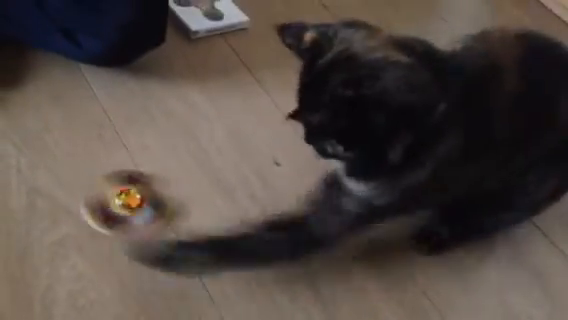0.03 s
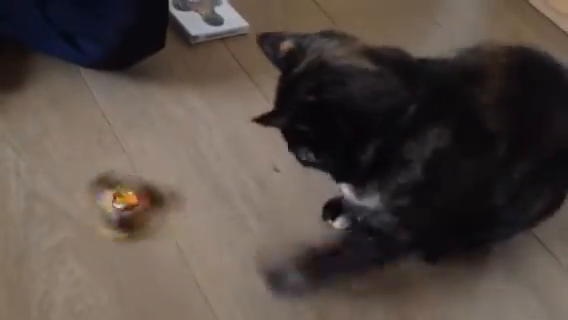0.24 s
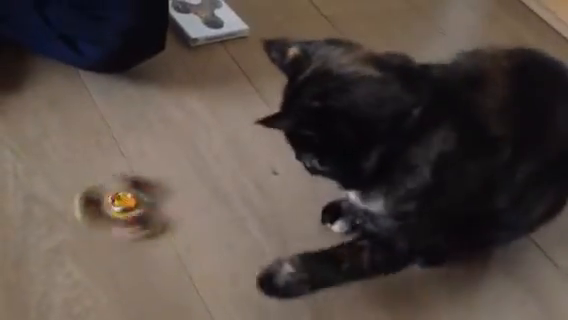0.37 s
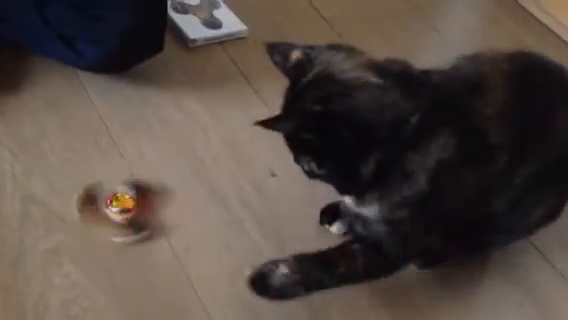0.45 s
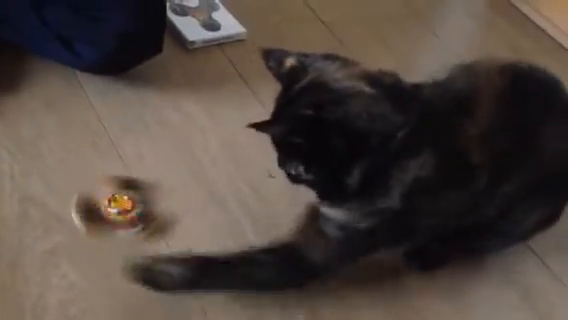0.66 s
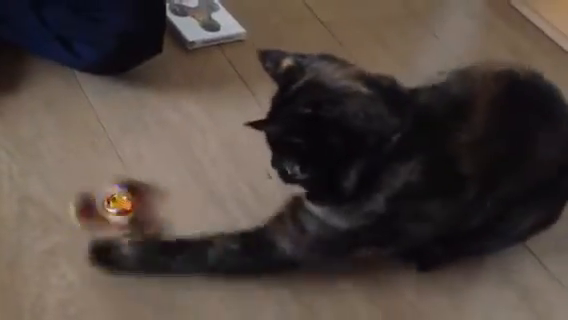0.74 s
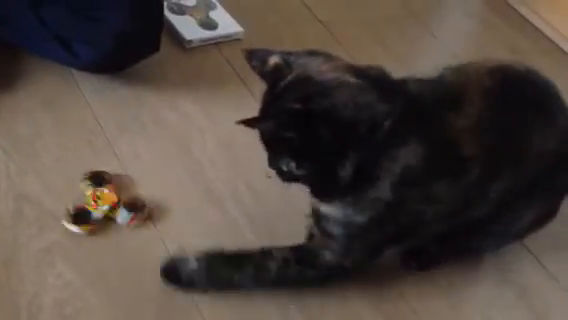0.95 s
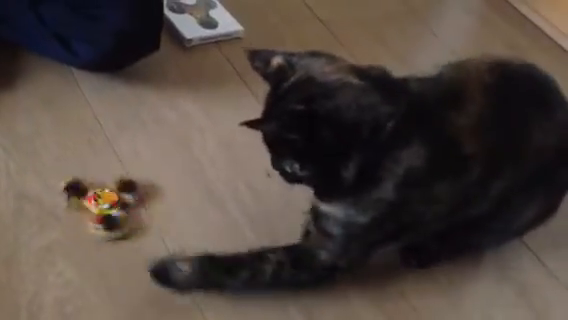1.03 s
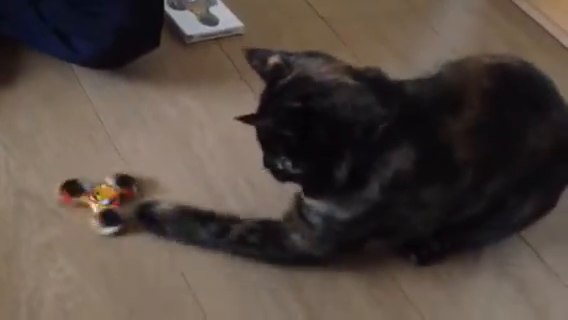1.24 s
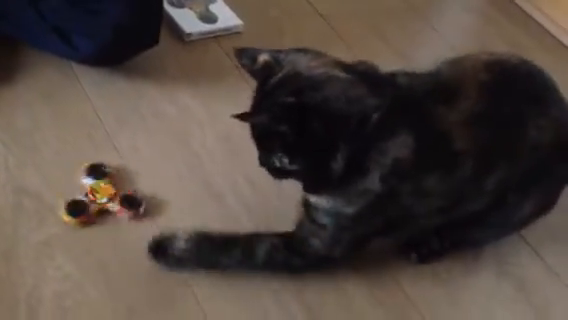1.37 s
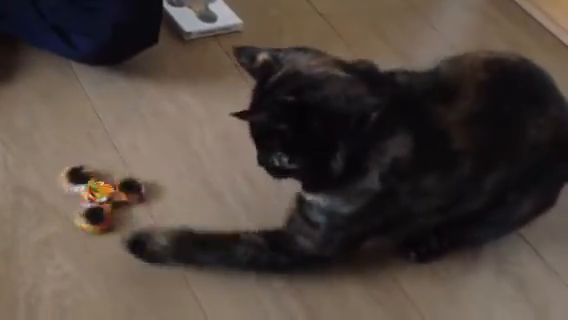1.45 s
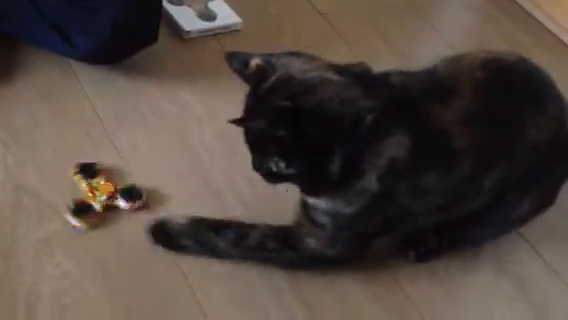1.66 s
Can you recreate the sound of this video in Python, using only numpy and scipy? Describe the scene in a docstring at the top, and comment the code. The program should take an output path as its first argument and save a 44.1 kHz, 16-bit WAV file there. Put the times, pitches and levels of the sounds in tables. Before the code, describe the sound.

A fidget spinner clatters on floorboards in a small, quiet room. Faint metal pings lead to a hard knock, followed by three bursts of rapid clicks and rattles as it rocks, with a soft whirr underneath.

```python
"""A soft whirr and faint metal pings come from a three-armed spinner that a cat bats on a wooden floor.
The toy is knocked down hard and clatters, then rocks from arm to arm in three runs of quickening taps,
with one brush of the paw. Every tap thumps the floorboard and rattles the ball bearing, and the rim
rumbles as the toy settles. A small room echoes it all over a faint steady hush."""
import sys
import numpy as np
from scipy import signal
from scipy.fft import rfft, irfft, next_fast_len
from scipy.io import wavfile
from scipy.ndimage import map_coordinates

SR = 44100
rng = np.random.default_rng(int(sys.argv[2]) if len(sys.argv) > 2 else 0)


def master(y):
    """Save y as 16-bit WAV."""
    cut = np.clip(np.atleast_2d(y).T, -1, 1)
    pcm = np.round(cut * 32767)  # scale
    wavfile.write(sys.argv[1], SR, pcm.astype(np.int16))


N = 74970

# Levels in the tables are relative. A fade time is how long a sound takes to drop by 60 dB.
# The tone colour of each noisy sound. Each row: frequency in Hz, level in dB.
HUSH_COLOUR = [(20, -34.5), (60, -1), (120, 2.5), (220, -6.5), (400, 3), (700, -13.5), (1700, -19.5),
               (2200, -16.5), (5000, -22), (9000, -26), (12000, -24), (15500, -35)]
BEARING_COLOUR = [(1000, -28), (4500, -18), (5500, -10), (6080, 4), (6600, -10.5), (7300, -9.5),
                  (10000, -22), (15000, -21)]
BOARD_HUM_COLOUR = [(100, -45), (250, -21), (350, -6.5), (430, -7.5), (600, -18.5), (1500, -29),
                    (4000, -63)]
RIM_COLOUR = [(40, -24), (100, -10.5), (140, -16.5), (175, -0.5), (220, 7.5), (300, -3.5), (450, -24.5),
              (700, -21), (1300, -36), (3000, -39)]
FUR_COLOUR = [(1000, -30), (5000, -14), (7000, -10), (8500, 0), (11000, -16), (14500, -6), (16000, -15)]
CRACK_COLOUR = [(40, -14), (140, -13), (300, -2), (600, 7.5), (780, -1), (1150, -1.5), (1600, -3.5),
                (2200, 0), (3200, -2.5), (4500, -2), (6400, -3.5), (8500, -5), (11000, -11.5), (14000, -18),
                (16000, -9)]
RATTLE_COLOUR = [(200, -9.5), (800, -18), (1300, -18.5), (2200, -25), (4400, -15.5), (5500, -2.5),
                 (6300, 7), (7100, -2), (9000, -6.5), (11000, -14.5), (14000, -9), (16000, -8.5)]
TICK_COLOUR = [(200, -24), (700, -2.5), (950, 2), (1300, 1.5), (1700, -8), (3000, -14.5), (5000, -11.5),
               (15000, -25.5)]
# The notes each part rings with. Each row: frequency in Hz, level in dB, fade time in seconds.
PING_NOTES = [(5080, -3, 0.038), (5850, -25.5, 0.025), (12040, -21, 0.034)]
FRAME_NOTES = [(565, -10.5, 0.16), (642.5, -11.5, 0.18), (855, -10.5, 0.056), (907, -11.5, 0.15),
               (947, -4.5, .04), (1177, -6, 0.026), (1290, -21, 0.036), (2150, -21, 0.11),
               (2570, -18, 0.094), (3107, -21, 0.069), (3914, -15.5, 0.085), (4420, -18.5, 0.15),
               (6270, -11, 0.099), (6364, -9, 0.045)]
STEEL_RING_NOTES = [(6080, -1, .04), (6300, 0, .025), (6530, -4, .025)]
HARD_BOARD_NOTES = [(246, -15.5, 0.028), (373.7, -3.5, 0.044), (437, -1.5, 0.032)]  # the floorboard under a hard blow
LIGHT_BOARD_NOTES = [(249.4, -13, 0.037), (341.3, -4, 0.028), (389.1, -4.5, 0.037), (577, -12, 0.013)]  # the floorboard under a light tap
# How long the room rings. Each row: frequency in Hz, fade time in seconds.
ROOM_FADES = [(150, .5), (400, 0.25), (1000, 0.56), (3000, 0.57), (7000, 0.55), (15000, 0.44)]
# Early echoes from the walls. Each row: delay in seconds, level in dB.
WALL_ECHOES = [(0.017, -25.5), (0.0282, -12.5)]
# How the bearing's whirr and the rim's rumble rise and fall. Each row: time in seconds, level in dB.
BEARING_LEVELS = [(0, -70), (.13, -71), (.18, -74), (.4, -66.5), (.62, -71.5), (0.751, -77), (.89, -78),
                  (.98, -69.5), (1.15, -71), (1.3, -81), (1.4, -72.5), (1.55, -70.5), (1.66, -85)]
RIM_LEVELS = [(0, -80), (.42, -69), (.55, -60), (.68, -61), (.78, -82.5), (.92, -66.5), (1.05, -59),
              (1.2, -57.5), (1.29, -81), (1.42, -59), (1.56, -59), (1.68, -71.5)]
# Scrapes inside the bearing. Each row: start in seconds, level in dB, length in seconds.
SCRAPES = [(0.000, -57, 0.0043), (0.029, -63, 0.012), (0.043, -50, .003), (0.107, -55, 0.0023),
           (0.12, -60, 0.0091), (0.195, -51.5, 0.002)]
# Hard blows on the floor. Each row: start in seconds, thud level in dB, crack level in dB,
# crack fade time in seconds.
HARD_BLOWS = [(0.2232, -21, -21, 0.038), (0.2380, -28.5, -32.5, 0.061), (0.2426, -35, -31, 0.055),
              (0.246, -26.5, -41.5, 0.09), (0.2610, -33, -32, 0.061), (0.268, -36, -39, 0.18)]
# An arm meets the floor. Each row: start in seconds, thump, tick and rattle levels in dB,
# rattle length in seconds, rattle treble tilt in dB per octave.
ARM_TAPS = [(0.2146, -31.5, -43, -33, .003, -7), (0.2523, -42, -59, -33, 0.0042, -1),
            (0.338, -63, -66, -52, 0.0037, -9), (0.381, -75, -58, -47.5, 0.0086, -7),
            (0.4217, -46.5, -56, -47.5, 0.01, -6.5), (0.4265, -93, -77, -49.5, 0.0011, 7),
            (0.4642, -45.5, -55, -50.5, 0.0035, -5.5), (0.4999, -55, -54.5, -48.5, .002, -8),
            (0.504, -55, -63, -46.5, 0.0018, -5), (0.5362, -35, -48.5, -46, 0.0039, -3.5),
            (0.5647, -38, -50, -48, 0.0037, -3.5), (0.5910, -42.5, -59.5, -60, 0.0025, -3),
            (0.6176, -79, -74, -58.5, .003, -5), (0.6342, -43.5, -57, -50, 0.0019, -6.5),
            (0.65, -53, -61.5, -57, .002, -4), (0.669, -51, -66, -58.5, 0.0013, -6),
            (0.9120, -37, -59.5, -49.5, 0.0049, -12), (0.966, -25.5, -47.5, -45.5, 0.0059, -1),
            (0.9755, -47, -72, -46.5, 0.0014, -4), (1.013, -30.5, -61, -44, 0.0029, -8),
            (1.021, -48, -64, -45.5, 0.0017, -11), (1.0519, -34, -47.5, -45, 0.0037, -7),
            (1.0853, -31, -60.5, -51, 0.0034, -5.5), (1.1150, -55, -55, -49, 0.0063, -3),
            (1.14, -72, -70, -57, 0.0056, -5), (1.1656, -48.5, -65, -54, 0.0014, -8),
            (1.1878, -46.5, -78, -57.5, .002, -3), (1.204, -42.5, -63, -61, 0.0016, 3),
            (1.219, -49, -70, -69, 0.0019, -4), (1.3237, -35.5, -55, -58.5, 0.0094, 0.5),
            (1.3682, -26, -58, -47, 0.0026, -4), (1.4080, -29, -56, -47.5, 0.004, -4),
            (1.415, -64, -77, -47, 0.0017, -0.5), (1.4455, -33, -67, -52.5, 0.0044, -4),
            (1.4743, -58, -77, -42, 0.0014, 6), (1.5036, -41.5, -58.5, -57, 0.0038, -11),
            (1.5288, -40, -64, -55, 0.0039, -8.5), (1.5526, -41, -57, -50.5, 0.0014, -8),
            (1.5700, -47.5, -59.5, -58, 0.0038, -10), (1.6900, -69, -77, -67, .009, -2.5)]

SCRAPE_GRAINS_PER_S, BALL_HITS_PER_S = 740, 4000
RATTLE_FADE_S, TICK_FADE_S = .012, .019


def amp(db):
    """Turn decibels into a factor to multiply by."""
    return 10 ** (np.asarray(db) / 20)


def along(points, hz):
    """Read between the rows of a frequency table, spacing octaves evenly."""
    freqs, values = np.transpose(points)
    return np.interp(np.log(hz + 1), np.log(freqs + 1), values)


def level_curve(rows):
    """Join (seconds, dB) points into a volume for every sample."""
    return amp(np.interp(np.arange(N) / SR, *np.transpose(rows)))


def add(track, start_s, sound):
    """Mix a sound into a track at a given time."""
    i = max(0, round(start_s * SR))
    track[i:i + len(sound)] += sound[:max(0, len(track) - i)]


def filtered(x, response):
    """Scale each frequency in x by response(hz)."""
    size = next_fast_len(N + SR // 2)
    return irfft(rfft(x, size) * response(np.fft.rfftfreq(size, 1 / SR)), size)[:N]


def noise(colour):
    """Noise with this tone colour and an average power of 1."""
    x = filtered(rng.standard_normal(N), lambda hz: amp(along(colour, hz)))
    return x / np.sqrt(np.mean(x ** 2) + 1e-20)


def wobble(rate):
    """A smooth curve through `rate` random values a second."""
    return map_coordinates(rng.standard_normal(int(N * rate / SR) + 4), [np.arange(N) * rate / SR])


def tiny_hits(t, per_second):
    """Single spikes of random size at random moments."""
    return rng.standard_normal(len(t)) * (rng.random(len(t)) < per_second / SR)


def click(colour, size=2048):
    """A click with this tone colour and an energy of 1."""
    cepstrum = irfft(np.log(amp(along(colour, np.fft.rfftfreq(size, 1 / SR)))))
    cepstrum[1:size // 2] *= 2  # folding the second half onto the first makes the click start sharply
    cepstrum[size // 2 + 1:] = 0
    pulse = irfft(np.exp(rfft(cepstrum)))
    return pulse / np.linalg.norm(pulse)


def ring(notes, t):
    """A struck part sounds several pure notes, each fading at its own speed."""
    return sum(amp(db - 60 * t / fade_s) * np.sin(2 * np.pi * hz * t) for hz, db, fade_s in notes)


def cut_bass(x, hz, order):
    """Turn down everything below hz; a higher order cuts more steeply."""
    return signal.sosfilt(signal.butter(order, hz, "high", fs=SR, output="sos"), x)


def hush():
    """The faint, steady background noise of the room."""
    return amp(-70.5) * noise(HUSH_COLOUR)


def room_echo(x, tail_db=-12, tail_delay_s=.006, wall_cutoff_hz=2500):
    """The walls send back two dull echoes and a tail that fades in about half a second."""
    hz, t, bands = signal.stft(rng.standard_normal(SR * 2 // 3), SR, nperseg=256)
    fading = amp(-60 * t / along(ROOM_FADES, hz)[:, None])
    tail = signal.istft(bands * fading, SR, nperseg=256)[1]
    out = np.zeros(N)
    add(out, tail_delay_s, amp(tail_db) * signal.fftconvolve(x, tail / np.linalg.norm(tail)))
    dull = filtered(x, lambda f: 1 / (1 + 1j * f / wall_cutoff_hz))
    for delay_s, db in WALL_ECHOES:
        add(out, delay_s, amp(db) * dull)
    return out


def bearing_whirr():
    """The turning bearing whirrs and hums unevenly through the floorboard."""
    whirr = noise(BEARING_COLOUR)
    hum = noise(BOARD_HUM_COLOUR) * amp(1 + 5.2 * wobble(rate=52))
    return level_curve(BEARING_LEVELS) * (whirr + hum)


def rim_rumble():
    """The toy rolls on its rim with a low rumble as each run of taps settles."""
    return level_curve(RIM_LEVELS) * noise(RIM_COLOUR) * amp(-5 + 3 * wobble(rate=60))


def paw_brush(start_s=.936, length_s=.032, db=-60):
    """Fur slides over the toy with a short, soft hiss."""
    progress = (np.arange(N) / SR - start_s) / length_s
    swell = np.interp(progress, [0, .3, 1, 1.2], [0, 1, .8, 0])
    return amp(db) * noise(FUR_COLOUR) * swell


def pings():
    """Brief scrapes inside the whirling bearing make a thin steel part ring."""
    out, t = np.zeros(N), np.arange(SR // 8) / SR
    for start_s, db, length_s in SCRAPES:
        scrape = tiny_hits(t, SCRAPE_GRAINS_PER_S) * np.exp(-t / length_s)
        ping = signal.fftconvolve(scrape, ring(PING_NOTES, t))[:len(t)]
        add(out, start_s, amp(db) * ping / (np.abs(ping).max() + 1e-12))
    return out


def knocks():
    """The toy lands hard: it snaps and cracks, its frame rings and the floorboard thuds."""
    ringing, bursts, t = np.zeros(N), np.zeros(N), np.arange(SR // 3) / SR
    first_crack_db = HARD_BLOWS[0][2]
    for start_s, thud_db, crack_db, fade_s in HARD_BLOWS:
        add(ringing, start_s, amp(thud_db) * ring(HARD_BOARD_NOTES, t))
        add(ringing, start_s, amp(crack_db - 4.5) * ring(FRAME_NOTES, t))
        burst = amp(-60 * t / fade_s) * rng.standard_normal(len(t))
        burst[0] = -amp(8.5 + .48 * (crack_db - first_crack_db))  # louder cracks open with a sharper snap
        add(bursts, start_s, amp(crack_db - 4) * burst)
    cracks = signal.fftconvolve(bursts, click(CRACK_COLOUR))[:N]
    return cut_bass(ringing + cracks, hz=205, order=3)


def bearing_rattle(t, length_s, tilt_db):
    """The balls chatter against their steel ring for a moment."""
    hits = tiny_hits(t, BALL_HITS_PER_S) * amp(-60 * np.maximum(t - length_s, 0) / RATTLE_FADE_S)
    detune = 1 + .012 * rng.uniform(-.82, 1)  # each rattle has a slightly different pitch
    one_hit = amp(-33) * ring(STEEL_RING_NOTES, t * detune)
    main_hz = STEEL_RING_NOTES[1][0]  # the tilt acts only above the ring's strongest note
    colour = [(hz, db + tilt_db * max(0, np.log2(hz / main_hz))) for hz, db in RATTLE_COLOUR]
    add(one_hit, 0, click(colour))
    rattle = signal.fftconvolve(hits, one_hit)[:len(t)]
    return rattle * np.sqrt(length_s * SR / (np.sum(rattle ** 2) + 1e-12))


def board_thump(t, rise_s=.0018):
    """The floorboard gives under a tap and rings briefly."""
    swing = ring(LIGHT_BOARD_NOTES, t) * (1 - np.exp(-(t / rise_s) ** 2))
    return cut_bass(swing, hz=164, order=1)


def taps(thump_lag_s=.0005):
    """Each time an arm lands, plastic ticks on wood, the board thumps and the bearing rattles."""
    out, ticks, t = np.zeros(N), np.zeros(N), np.arange(SR // 8) / SR
    for start_s, thump_db, tick_db, rattle_db, length_s, tilt_db in ARM_TAPS:
        add(out, start_s + thump_lag_s, amp(thump_db + 3) * board_thump(t))
        add(out, start_s, amp(rattle_db) * bearing_rattle(t, length_s, tilt_db))
        add(ticks, start_s, amp(tick_db - 4 - 60 * t / TICK_FADE_S) * rng.standard_normal(len(t)))
    return out + signal.fftconvolve(ticks, click(TICK_COLOUR))[:N]


def scene():
    """Mix the toy, its echo and the hush into one channel."""
    toy = knocks() + taps() + pings() + bearing_whirr() + rim_rumble() + paw_brush()
    return (toy + room_echo(toy) + hush())[None]


def record(dry):
    """Cut away the very highest treble."""
    top_hz = 15550
    return filtered(dry[0], lambda hz: 1 / np.sqrt(1 + (hz / top_hz) ** 200))[None]


dry = scene()
out = record(dry)
master(out)
```